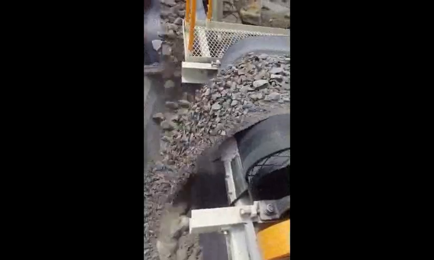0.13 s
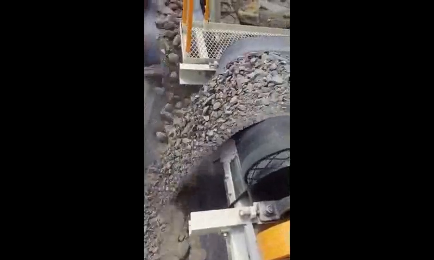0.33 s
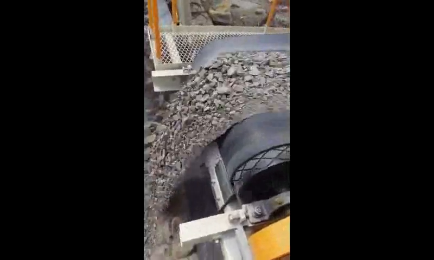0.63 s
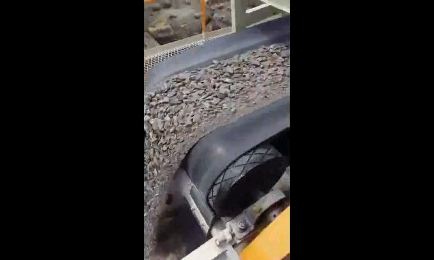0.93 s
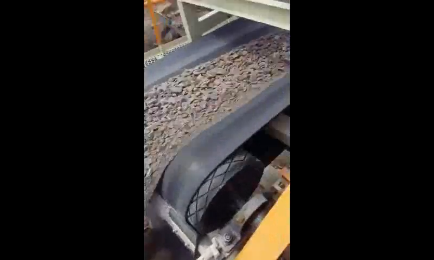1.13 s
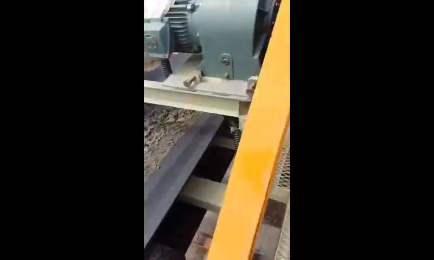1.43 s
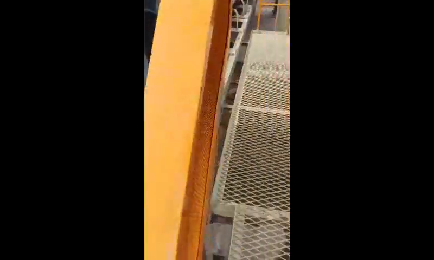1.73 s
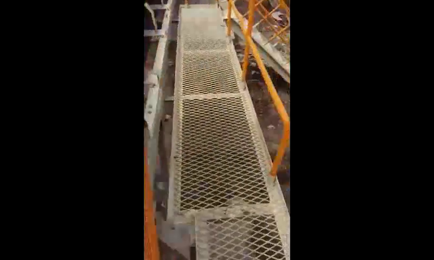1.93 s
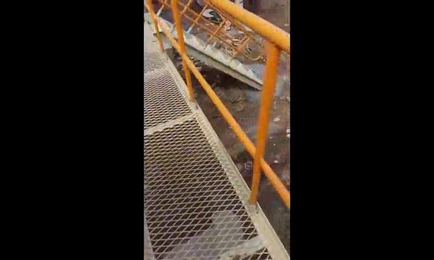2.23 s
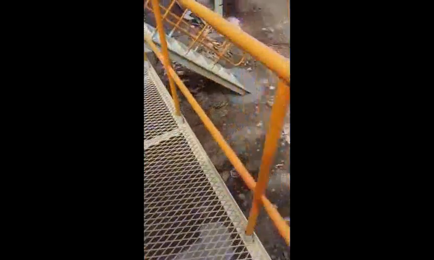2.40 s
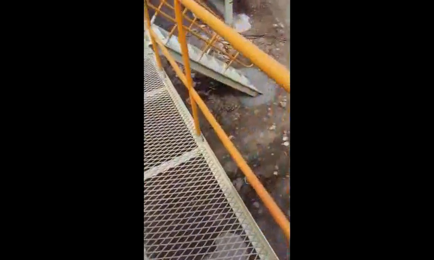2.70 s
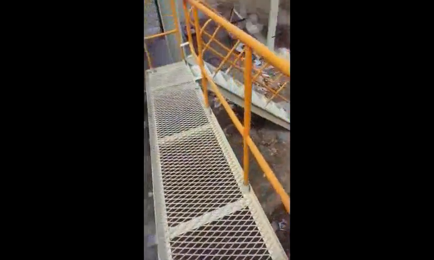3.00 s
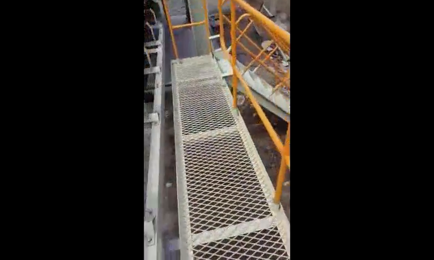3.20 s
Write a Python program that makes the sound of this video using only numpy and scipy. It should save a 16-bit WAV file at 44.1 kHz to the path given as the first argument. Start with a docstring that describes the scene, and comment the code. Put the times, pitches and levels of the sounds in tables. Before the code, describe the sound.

Gravel clatters densely and continuously on steel chutes over the rumble of conveyor machinery outdoors.

```python
"""A dense hail of stone clatters on steel chutes over rumbling machinery and a wavering gear tone.
Heavy rocks thump, a few nearer stones clink, and a drive motor hisses as it is passed: a microphone turns
from the head of a gravel conveyor towards a walkway in an open-air crushing plant.
Rumble and motor are coloured noise, the gear is a sine, the clatter and chute are ringing clicks,
the rustle is coloured clicks, and the rocks and nearer stones are single fading sines."""
import sys
import numpy as np
from scipy import signal
from scipy.fft import rfft, irfft
from scipy.io import wavfile
from scipy.ndimage import uniform_filter1d, minimum_filter1d

SR = 44100
rng = np.random.default_rng(int(sys.argv[2]) if len(sys.argv) > 2 else 0)


def store_wav(level_fs):
    """Save 16-bit WAV to argv[1]."""
    pcm = np.round(np.clip(np.atleast_2d(level_fs), -1, 1) * 32767)
    wavfile.write(sys.argv[1], SR, pcm.T.astype(np.int16))


N = 147735  # length in samples

# Loudness of the rumble over time.
# Each row: time in seconds, upper rumble in dB, lower rumble in dB, deep thud in dB.
RUMBLE_LEVELS = [(0, -19.5, -19.5, -35), (.1, -20, -15, -21), (.3, -20, -21, -25), (.5, -19, -18, -29),
                 (.74, -18, -18, -24.5), (1.02, -26.5, -24, -34.5), (1.28, -20.5, -20.5, -30.5),
                 (1.6, -20, -22.5, -32.5), (1.97, -18.5, -20.5, -30.5), (2.25, -19.5, -19, -27),
                 (2.6, -19, -24.5, -30.5), (2.78, -21, -19.5, -25), (3.02, -22.5, -24, -28.5),
                 (3.35, -19.5, -21.5, -29)]
# Colour of the three rumble layers. Each row: frequency in Hz, relative strength in dB per Hz.
UPPER_RUMBLE_COLOUR = [(235, -34), (270, 4), (310, 4.5), (380, 1.5), (450, -2), (510, -37.5)]
LOWER_RUMBLE_COLOUR = [(110, -22), (130, -2.5), (170, -1), (230, 0), (270, -4), (310, -24.5)]
DEEP_THUD_COLOUR = [(20, -34.5), (36, -37), (44, -11), (55, -16), (74, -2.5), (130, -4.5), (150, -17)]

# Loudness of the gear tone, before a small random waver. Each row: time in seconds, level in dB.
GEAR_LEVEL = [(0, -25.5), (.25, -40), (.5, -20.5), (.8, -22), (1.0, -33), (1.5, -26), (1.9, -25),
              (2.3, -21), (2.6, -30), (3.35, -27)]
GEAR_HZ, GEAR_WOBBLE_HZ = 237.7, 1.0  # middle pitch, typical wander around it

# Loudness of the clatter in four pitch bands.
# Each row: time in seconds, low band in dB, middle band in dB, high band in dB, top band in dB.
CLATTER_LEVELS = [(0, -23, -21.5, -25, -31), (.1, -17, -23, -23, -31), (.17, -21, -24, -23.5, -30),
                  (.27, -20.5, -20, -23, -33), (.39, -21, -22.5, -23.5, -32),
                  (.5, -17.5, -20, -18.5, -31.5), (.64, -22, -24.5, -26, -31.5),
                  (.76, -19.5, -26, -27.5, -32), (.85, -21.5, -23, -23, -30.5),
                  (.95, -22.5, -28.5, -27, -33.5), (1.08, -21.5, -27.5, -28.5, -34),
                  (1.28, -22, -26.5, -27, -35), (1.44, -22, -28, -24.5, -34),
                  (1.54, -26.5, -22.5, -26, -29.5), (1.61, -21, -21.5, -20, -26.5),
                  (1.73, -22.5, -17, -26, -30.5), (1.85, -19.5, -20, -17, -27),
                  (2.0, -20.5, -23, -23, -31.5), (2.22, -19, -20.5, -19, -31.5),
                  (2.47, -21, -21.5, -21, -35), (2.6, -19, -19, -21.5, -31.5),
                  (2.74, -18.5, -20, -22, -27.5), (3.0, -19, -21, -23, -29), (3.35, -17, -19.5, -19.5, -25)]
# Colour of those four bands. Each row: frequency in Hz, relative strength in dB per Hz.
LOW_STONE_COLOUR = [(250, -42.5), (430, -4), (475, 0), (615, -2), (817, -0.5), (1150, -7), (1500, -59.5),
                    (2530, -120)]
MIDDLE_STONE_COLOUR = [(950, -10.5), (1100, -7.5), (1350, 2), (1650, 1), (1800, -7.5), (2000, -32)]
HIGH_STONE_COLOUR = [(1600, -35.5), (1800, 2), (2170, 6), (2600, -7), (2900, -39.5)]
TOP_STONE_COLOUR = [(2350, -14), (2600, -8), (3000, -7), (3400, -10.5), (3700, -15)]
STONES_PER_S, STONE_SPREAD_DB = 7000, 2.3  # rate before surges, unevenness of the hits
STONE_CYCLES, SURGE_DB = 14.5, 1.2  # cycles until a ring has faded 60 dB, typical surge in the rate

# Notes of the steel chute.
# Each row: pitch in Hz, level in dB before the overall chute level, time to fade by 60 dB in seconds.
CHUTE_NOTES = [(830, -30, .15), (1355, -40, .08), (1675, -29, .15)]
# Overall chute level. Each row: time in seconds, change in dB added to every note.
CHUTE_CHANGES = [(0, -4), (.9, -8.5), (1.6, -7.5), (2.36, -6), (2.44, 8.5), (2.54, 10), (2.62, -14),
                 (2.82, -3), (2.88, -2), (2.96, -5), (3.35, 4.5)]
CHUTE_HITS_PER_S = 600

# Loudness of the hiss. Each row: time in seconds, motor hiss in dB, gravel rustle in dB.
HISS_LEVELS = [(0, -38, -34.5), (.2, -36.5, -34), (.4, -37.5, -30.5), (.55, -38, -35), (.65, -37, -37.5),
               (.78, -34.5, -33.5), (.9, -35, -34.5), (.98, -28.5, -36.5), (1.1, -30.5, -37),
               (1.23, -32, -38), (1.31, -37, -38), (1.4, -30.5, -35.5), (1.48, -35.5, -39),
               (1.63, -27.5, -35.5), (1.85, -30, -35.5), (2.1, -33.5, -35), (2.35, -36.5, -39.5),
               (2.7, -34.5, -39.5), (3.35, -32.5, -38.5)]
# Highest rustle, strongest by the belt head, before a small random flicker.
# Each row: time in seconds, level in dB.
TOP_RUSTLE_LEVEL = [(0, -50), (.06, -40), (.14, -41.5), (.22, -33), (.3, -43.5), (.38, -33.5), (.46, -43.5),
                    (.56, -49.5), (.67, -64), (.88, -47), (1.15, -52.5), (1.5, -58), (2.5, -70),
                    (2.69, -47), (2.85, -58), (3.35, -59)]
# Colour of the hissing layers. Each row: frequency in Hz, relative strength in dB per Hz.
MOTOR_COLOUR = [(3300, -32), (3650, -6), (3900, -3), (4250, -4.5), (4550, -12), (5000, -19.5)]
RUSTLE_COLOUR = [(4100, -17.5), (4550, -1.5), (5300, -5.5), (6000, -8), (6700, -14), (7200, -19),
                 (7700, -35)]
TOP_RUSTLE_COLOUR = [(6300, -29.5), (7000, -9.5), (7600, -6), (8200, -9), (9200, -1), (10200, -24)]

# Single near stones, then heavy rocks landing.
# Each row: start in seconds, level in dB before the fade-in, pitch in Hz, time to fade by 60 dB in seconds.
NEAR_STONES = [(.056, -10, 650, .08), (.114, -15, 2100, .05), (.123, -10, 780, .07), (.206, -11, 985, .06),
               (.222, -11, 1000, .06), (.248, -10, 800, .07), (.252, -13, 1450, .05), (.327, -7, 1570, .06),
               (.329, -12, 1250, .04), (.355, -22, 7350, .03), (.402, -24, 3300, .07),
               (.432, -25, 7150, .025), (.441, -11, 1540, .06), (.48, -23, 3260, .07),
               (.501, -11, 1590, .04), (.528, -11, 1550, .07), (.595, -17, 3280, .09),
               (.597, -11, 860, .07), (.704, -22, 3270, .06), (.83, -24, 3770, .12), (.833, -13, 2150, .07),
               (.849, -13, 1410, .05), (1.024, -17, 2050, .05), (1.153, -16, 2120, .06),
               (1.22, -23, 2850, .09), (1.277, -13, 902, .05), (1.344, -15, 1800, .04),
               (1.591, -12, 1980, .07), (1.61, -21, 3650, .07), (1.677, -19, 2900, .04),
               (1.7, -10, 1290, .045), (1.731, -11, 1420, .045), (1.787, -12, 1040, .045),
               (1.79, -23, 3600, .05), (1.795, -25, 4850, .05), (2.183, -11, 1890, .05),
               (2.225, -11, 1920, .09), (2.27, -11, 650, .12), (2.3, -13, 1750, .08),
               (2.404, -11, 1600, .07), (2.408, -25, 4800, .04), (2.675, -13, 1620, .07),
               (2.684, -12, 1360, .12), (2.69, -23, 3950, .05), (2.735, -12, 860, .08),
               (2.91, -12, 1330, .09), (3.095, -13, 1630, .045), (3.155, -13, 1620, .045)]
HEAVY_ROCKS = [(.07, -13, 450, .15), (.085, -7, 90, .32), (.12, -13, 320, .2), (.28, -11, 220, .18),
               (.335, -13, 165, .22), (.375, -14, 340, .15), (.505, -10, 215, .2), (.585, -13, 130, .2),
               (.61, -13, 315, .25), (1.2, -18, 100, .2), (2.06, -18, 95, .2), (2.29, -12, 200, .22),
               (2.72, -17, 85, .3), (2.745, -13, 140, .25), (2.845, -12, 200, .18)]
STONE_ATTACK_S, ROCK_ATTACK_S = .002, .02  # fade-in times

LIMIT, LIMIT_WINDOW_S = .92, .004  # highest peak let through the limiter, its reaction time
CUTOFF_HZ = 10300  # nearly nothing is left above this


def from_db(db):
    """Turn decibels into a multiplier; 20 dB is ten times the height."""
    return 10 ** (np.asarray(db) / 20)


def rms_one(x):
    """Scale a sound so its average strength (rms) is 1."""
    return x / np.sqrt(np.mean(x ** 2) + 1e-20)


def in_time(rows):
    """Draw straight lines between the rows of a table: one smooth curve per column."""
    seconds, *columns = np.transpose(rows)
    return [np.interp(np.arange(N) / SR, seconds, column) for column in columns]


def drift(rate):
    """Wander slowly by chance around 0 with a spread of 1; a higher rate (Hz) wanders faster."""
    step = 40  # work on every 40th sample, then join the points with lines
    r = np.exp(-2 * np.pi * rate * step / SR)
    chance = rng.standard_normal(N // step + 2002)
    slow = signal.lfilter([1], [1, -2 * r, r * r], chance)[2000:]  # drop the filter's start-up
    return np.interp(np.arange(N) / step, np.arange(len(slow)), rms_one(slow))


def ring(clicks, hz, t60):
    """Let each click set off a fading sine, as tall as the click, that drops 60 dB in t60 seconds."""
    r = from_db(-60 / (t60 * SR))  # shrinkage per sample
    w = 2 * np.pi * hz / SR  # turn per sample
    # the tiny offset keeps the filter from working on numbers too small to be fast
    return signal.lfilter([0, np.sin(w)], [1, -2 * r * np.cos(w), r * r], clicks + 1e-18)


def colour(x, spectrum):
    """Reshape a sound's balance of frequencies, nearly silent beyond the table's ends; rms 1."""
    hz, db = np.transpose(spectrum)
    bins = np.maximum(np.arange(N // 2 + 1) * SR / N, 1)
    curve_db = np.interp(np.log(bins), np.log(hz), db, -120, -120)
    return rms_one(irfft(rfft(x) * from_db(curve_db), N))


def noise(spectrum, flicker_db, rate):
    """Make noise whose level flickers by chance, then colour it."""
    flickering = rng.standard_normal(N) * from_db(flicker_db * drift(rate))
    return colour(flickering, spectrum)


def hail(per_s, spread_db, surge_db):
    """Scatter clicks of uneven size and random sign in time; surges raise and lower their rate."""
    extra_db = spread_db * np.minimum(rng.exponential(1, N), 4)
    sizes = from_db(extra_db) * rng.choice([-1, 1], N)
    hits = rng.random(N) < per_s * from_db(surge_db) / SR
    return sizes * hits


def rumble():
    """Three layers of flickering low noise: upper rumble, lower rumble and deep thud."""
    upper_db, lower_db, deep_db = in_time(RUMBLE_LEVELS)
    upper = from_db(upper_db) * noise(UPPER_RUMBLE_COLOUR, 1.34, 8.2)
    lower = from_db(lower_db) * noise(LOWER_RUMBLE_COLOUR, 1.0, 9.7)
    deep = from_db(deep_db) * noise(DEEP_THUD_COLOUR, 0.99, 6.0)
    return upper + lower + deep


def gear_tone():
    """A sine whose pitch and level both waver by chance."""
    pitch = GEAR_HZ + GEAR_WOBBLE_HZ * drift(7.7)
    phase = 2 * np.pi * np.cumsum(pitch) / SR
    level_db = in_time(GEAR_LEVEL)[0] + 2 * drift(6)
    return from_db(level_db) * np.sqrt(2) * np.sin(phase)  # root 2 gives the sine rms 1


def clatter():
    """Each stone of the hail rings briefly at one of 36 pitches; higher pitches fade sooner."""
    clicks = hail(STONES_PER_S, STONE_SPREAD_DB, SURGE_DB * drift(14.0))
    pitches = np.geomspace(380, 4000, 36)
    dealt = rng.integers(0, 36, N)  # which pitch a stone gets
    rings = np.zeros(N)
    for k, hz in enumerate(pitches):
        # the square root makes up for the shorter rings of high pitches
        rings += np.sqrt(hz) * ring(clicks * (dealt == k), hz, STONE_CYCLES / hz)
    colours = (LOW_STONE_COLOUR, MIDDLE_STONE_COLOUR, HIGH_STONE_COLOUR, TOP_STONE_COLOUR)
    return sum(from_db(db) * colour(rings, band) for db, band in zip(in_time(CLATTER_LEVELS), colours))


def chute():
    """Random stone hits keep each note of the steel chute ringing."""
    rings = np.zeros(N)
    for hz, db, t60 in CHUTE_NOTES:
        hits = hail(CHUTE_HITS_PER_S, 2.0, 0)
        rings += from_db(db) * rms_one(ring(hits, hz, t60))
    return from_db(in_time(CHUTE_CHANGES)[0]) * rings


def motor_hiss():
    """The drive motor is flickering noise in a narrow range of the treble."""
    return from_db(in_time(HISS_LEVELS)[0]) * noise(MOTOR_COLOUR, 1.2, 15)


def gravel_rustle():
    """Fine gravel is a very dense hail of clicks, coloured into two treble layers."""
    grit = hail(11000, 3.0, 2.9 * drift(16.0))
    rustle = from_db(in_time(HISS_LEVELS)[1]) * colour(grit, RUSTLE_COLOUR)
    top_db = in_time(TOP_RUSTLE_LEVEL)[0] + 2 * drift(30)
    return rustle + from_db(top_db) * colour(grit, TOP_RUSTLE_COLOUR)


def single_hits(rows, attack_s):
    """Each stone or rock is one sine that fades in over attack_s seconds while it dies away."""
    out = np.zeros(N + SR)  # spare room for the last rings
    t = np.arange(SR // 3) / SR
    for start, db, hz, t60 in rows:
        i = int(start * SR)
        fading = from_db(db - 60 * t / t60)
        fade_in = np.minimum(t / attack_s, 1)
        out[i:i + len(t)] += fading * fade_in * np.sin(2 * np.pi * hz * t)
    return out[:N]


def scene():
    """Add all the sources together at one microphone."""
    machinery = rumble() + gear_tone()
    gravel = clatter() + chute() + gravel_rustle()
    falls = single_hits(NEAR_STONES, STONE_ATTACK_S) + single_hits(HEAVY_ROCKS, ROCK_ATTACK_S)
    return (machinery + gravel + motor_hiss() + falls)[None]


def record(dry):
    """A limiter smoothly turns down around the peaks, then a steep filter cuts the top."""
    width = int(LIMIT_WINDOW_S * SR)
    need = LIMIT / np.maximum(np.abs(dry), LIMIT)
    lowest = minimum_filter1d(need, 2 * width + 1)  # hold the turn-down on both sides of a peak
    gain = uniform_filter1d(uniform_filter1d(lowest, width), width)
    top_cut = signal.cheby2(12, 70, CUTOFF_HZ, fs=SR, output="sos")
    return signal.sosfilt(top_cut, gain * dry)


dry = scene()
out = record(dry)
store_wav(out)
```